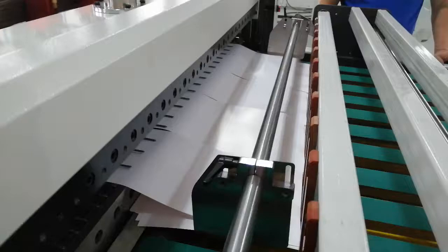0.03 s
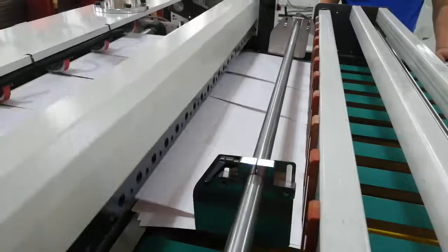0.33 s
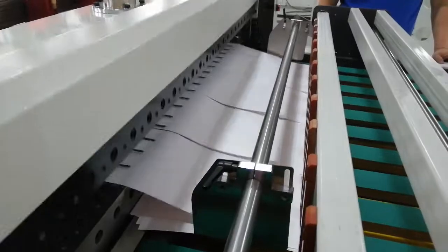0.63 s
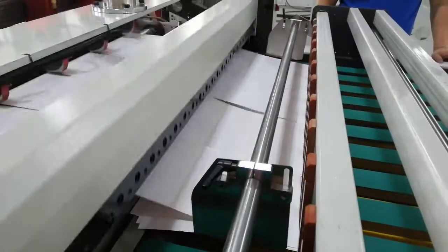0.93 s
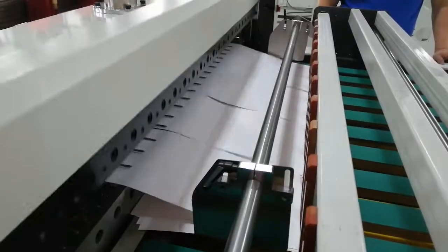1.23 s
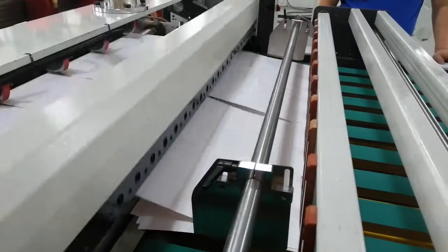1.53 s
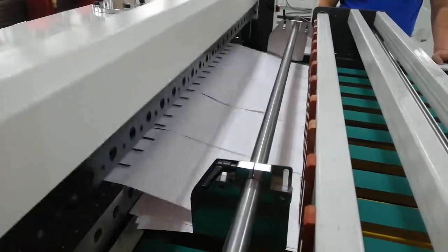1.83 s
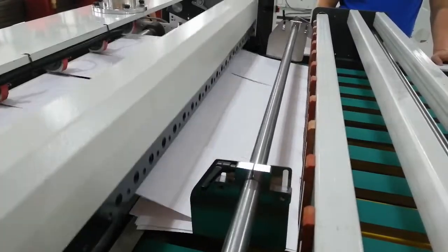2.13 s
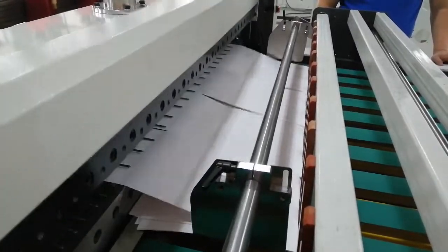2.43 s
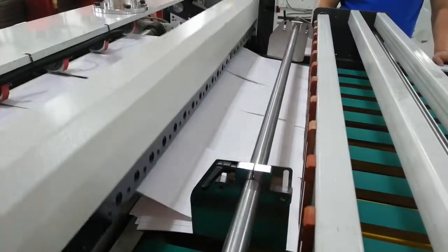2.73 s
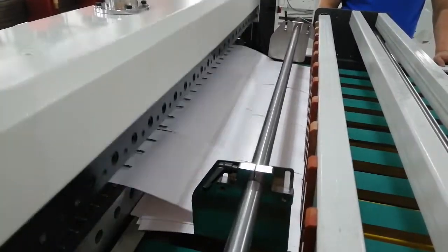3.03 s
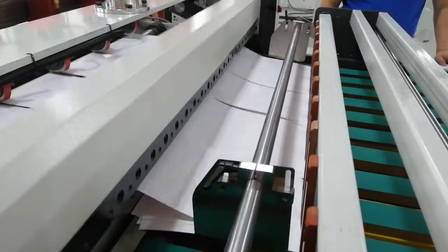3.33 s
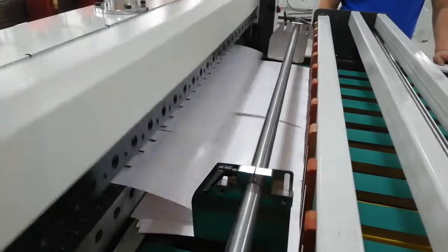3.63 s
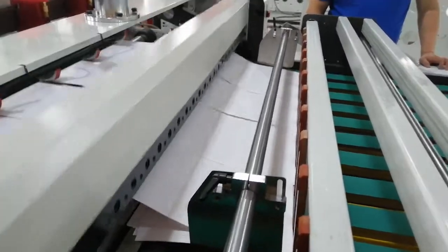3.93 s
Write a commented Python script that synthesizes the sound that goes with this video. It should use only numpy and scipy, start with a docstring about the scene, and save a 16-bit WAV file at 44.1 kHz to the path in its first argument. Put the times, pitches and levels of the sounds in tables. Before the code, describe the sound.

Close up, a rotary paper cutter repeats a quick cycle: two metallic clacks with brief blade squeaks, a soft flop, then a swish of sliding paper. A pulsing drive whine and slightly reverberant factory noise continue underneath.

```python
"""Steel clacks over a whining drive and steady factory noise: a rotary paper sheeter, 98 cuts a minute.
Each turn the knife drum grinds through the web in two clacks that ring the frame, and the blades squeak.
The cut sheet flops down, hisses over the stack and bumps its stop. The drive sags under each cut,
its electronics whistle, and the web rubs through the feed. Heard close by, in a short reverberation."""
import sys
import numpy as np
from scipy import signal
from scipy.fft import rfft, irfft
from scipy.io import wavfile

SR = 44100
rng = np.random.default_rng(int(sys.argv[2]) if len(sys.argv) > 2 else 0)


def transcribe(u):
    """Save the signal u as a 16-bit wav file named by the first command-line argument.

    u: samples, shape (n,) or (channels, n), limited to [-1, 1]; the rate is SR.
    q: integer samples, one column per channel.
    """
    v = np.clip(np.atleast_2d(u).T, -1, 1)
    q = np.round(v * 32767).astype(np.int16)
    wavfile.write(sys.argv[1], SR, q)


N = 176400
TIME_S, FREQ_HZ = np.arange(N) / SR, np.maximum(np.arange(N // 2 + 1) * SR / N, 1)
FIRST_CUT_S, CYCLE_S = 0.3222, 0.6149
CUTS_S = FIRST_CUT_S + CYCLE_S * np.arange(-1, 6)  # times within a turn count from these

# Strength of each turn. Each row: knife, sheet, feed, flop and whine offsets in dB.
TURN_OFFSETS = [(-3, -3, 0, -5, -2.5), (-4, -2, -4.5, -3.5, -2), (-0.5, 1.2, 2, 3.5, 1.5),
                (.5, -0.5, -0.5, 0, .5), (0, 0, -1, 1, 0.5), (-0.5, -.5, -2.5, -2.5, -1),
                (-1, 0, -.5, -3, 0)]
KNIFE_TURN_DB, SHEET_TURN_DB, FEED_TURN_DB, FLOP_TURN_DB, WHINE_TURN_DB = np.array(TURN_OFFSETS).T
# Knife drum contacts. Each row: peak time, attack and decay in seconds, centre in Hz,
# spread in octaves, level in dB.
KNIFE_CONTACTS = [(0.015, 0.013, 0.032, 2900, 0.56, -32), (0.012, 0.0069, 0.031, 2000, .25, -31),
                  (0.145, 0.015, 0.013, 1890, 0.19, -32), (0.016, 0.014, 0.034, 1020, 0.65, -35.5),
                  (0.049, .018, 0.055, 960, 0.65, -33.5), (0.108, 0.0046, 0.016, 630, 0.43, -32),
                  (0.1434, 0.06, 0.018, 2760, 0.75, -32), (0.1226, 0.018, 0.092, 990, 0.64, -32),
                  (0.018, 0.02, 0.02, 6900, 0.51, -36.5), (.138, 0.047, 0.016, 6500, 0.52, -41)]
# Steel frame modes. Each row: frequency in Hz, width in Hz, level in dB re the broad response.
FRAME_MODES = [(564, 79, 10), (695, 19, 9), (854, 17, 3.5), (1086, 27, -0.5), (1350, 42, -12.5),
               (1767, 28, 3.5), (1838, 26.5, 13), (2192, 22, 8), (2745, 99, 6.5), (3120, 100, 5),
               (3490, 230, -5.5), (6180, 200, 10.5), (6790, 237, 6.5)]
# Blade squeaks. Each row: peak time, attack and decay in seconds, pitch in Hz,
# glide in Hz per second, level in dB.
BLADE_SQUEAKS = [(.022, .012, .014, 1880, -4000, -31), (.038, .012, .020, 1600, 7, -39),
                 (0.0155, .010, .012, 3400, 14009, -38), (.136, .012, .010, 2890, 7993, -34.5),
                 (0.1507, .018, .010, 1860, -500, -29)]
# Drive load over a turn. Each row: time in seconds, whine offset in dB.
DRIVE_LOAD = [(.0, -3), (.06, 3.5), (.095, 0.5), (.125, -0.5), (.185, -6), (.21, 1), (0.234, -0.5),
              (.275, 0), (.43, -2.5), (.465, -2), (.545, -8.5), (0.578, 0)]
# Web rubbing in the feed. Each row: frequency in Hz, relative density in dB.
FEED_SPECTRUM = [(1200, -10), (2000, -16.5), (3000, -3.5), (4000, -11.5), (4700, 1), (5300, 3.5),
                 (5900, -6), (6800, -8.5), (9000, -28), (15000, -58)]
# Treble peaks in the hiss. Each row: frequency in Hz, width in Hz, added peak in dB re the broad hiss.
HISS_PEAKS = [(5165, 120, -7.5), (5630, 180, -2.5), (8000, 220, -13.5), (14950, 410, -10)]
# Motor electronics. Each row: centre in Hz, spread in octaves, level in dB.
SWITCHING_BANDS = [(12050, 0.021, -60), (13990, 0.0088, -60)]
# Steady factory noise, with a thin high hiss near 15 kHz.
# Each row: frequency in Hz, relative density in dB.
HALL_SPECTRUM = [(18, -44), (30, -22.5), (205, -5.5), (274, -7), (437, -9), (1560, -13.5), (2840, -13.5),
                 (4090, -22.5), (5440, -26), (10700, -64.5), (15000, -33.5)]
# Hall rumble. Each row: frequency in Hz, relative density in dB.
RUMBLE_SPECTRUM = [(20, 0), (35, -1), (70, 2.5), (130, 2), (220, -2.5), (400, -20.5), (900, -23)]
# Flop, flutter and stop of the sheet. Each row: peak time, attack and decay in seconds,
# centre in Hz, spread in octaves, level in dB.
SHEET_BLOWS = [(.202, 0.017, 0.026, 213, 0.79, -35), (0.271, 0.063, 0.07, 306, 0.59, -39),
               (.345, 0.078, 0.046, 570, 0.53, -38.5), (.468, 0.017, 0.036, 108, 1.22, -42),
               (.206, 0.011, .025, 2380, .9, -37), (.315, .025, 0.029, 3800, 1.1, -37),
               (.470, 0.015, 0.12, 2200, 1.07, -42.5)]
# Slide of the sheet. Each row: time in seconds, relative level in dB.
SLIDE_ENVELOPE = [(.10, -27), (.19, -38), (.25, -12.5), (.32, -0.5), (.40, 1.5), (.47, 3), (.52, -1.5),
                  (0.579, -9.5), (.64, -22), (.72, -68)]
# Hiss of the sliding sheet. Each row: frequency in Hz, relative density in dB.
SLIDE_SPECTRUM = [(880, -40), (1500, -82), (1620, -60), (2030, -49), (2750, -14), (3830, -10.5),
                  (4800, -8.5), (5190, 0.5), (5720, -2.5), (6500, -6.5), (7980, -1.5), (9230, -7.5),
                  (12100, -10), (14500, -3), (15500, -5.5)]
# Stereo image. Each row: frequency in Hz, left-right correlation.
STEREO_CORRELATION = [(100, 1), (300, 1), (700, 0.87), (1500, 0.4), (3000, 0.21), (12000, 0.05)]
# Colour of the two microphone ports. Each row: frequency in Hz, left minus right in dB.
PORT_BALANCE = [(60, 3), (180, 1.3), (360, -3.5), (550, -2), (1100, 4), (1800, 5.5), (2500, 6.5),
                (4000, 8.5), (5400, 11.5), (6600, -0.5), (8000, -15.5), (9000, -5.5), (10000, -8.5),
                (11500, 2.5), (13000, 5.5), (15000, 15)]


def undb(db):
    """Decibels to gain."""
    return 10 ** (np.asarray(db) / 20)


def unit(x):
    """Scale to rms 1."""
    return x / np.sqrt(np.mean(x ** 2))


def curve(points):
    """Interpolate (Hz, value) rows over log frequency."""
    hz, value = np.array(points, float).T
    return np.interp(np.log(FREQ_HZ), np.log(hz), value)


def band(hz, octaves):
    """Gaussian band on the octave scale."""
    return np.exp(-0.5 * (np.log2(FREQ_HZ / hz) / octaves) ** 2)


def colour(pair, gain):
    """Filter two independent signals into a stereo pair, alike in the bass, rms 1."""
    mid, side = rfft(pair) * gain
    correlation = np.clip(curve(STEREO_CORRELATION), 0, 1)
    mid, side = mid * np.sqrt(1 + correlation), side * np.sqrt(1 - correlation)
    return unit(irfft(np.array([mid + side, mid - side]), N))


def noise():
    """Two independent white noises."""
    return rng.standard_normal((2, N))


def walk(rate_hz):
    """Smooth random drift, rms 1."""
    return unit(irfft(rfft(rng.standard_normal(N)) * np.exp(-(FREQ_HZ / rate_hz) ** 2), N))


def swing(peak_s):
    """Cosine peaking once a turn."""
    return np.cos(2 * np.pi * (TIME_S - FIRST_CUT_S - peak_s) / CYCLE_S)


def blows(peak_s, attack_s, decay_s, turn_db):
    """Envelope, once a turn: linear rise, exponential fall."""
    ages_s = [TIME_S - cut_s - peak_s for cut_s in CUTS_S]
    return sum(undb(db) * np.clip(1 + age_s / attack_s, 0, 1) * np.exp(-np.maximum(age_s, 0) / decay_s)
               for age_s, db in zip(ages_s, turn_db))


def knife(fresh_share=0.35):
    """The same steel edges chatter over each other every turn and ring the frame."""
    frame = 1 + sum(undb(db) / (1 + 2j * (FREQ_HZ - hz) / width_hz) for hz, width_hz, db in FRAME_MODES)
    turn_sample = np.arange(N) % round(CYCLE_S * SR)
    out = 0
    for peak_s, attack_s, decay_s, hz, octaves, db in KNIFE_CONTACTS:
        repeating = noise()[:, turn_sample]
        chatter = np.sqrt(1 - fresh_share) * repeating + np.sqrt(fresh_share) * noise()
        force = blows(peak_s, attack_s, decay_s, KNIFE_TURN_DB)
        force_rms = np.sqrt(np.mean(force ** 2))
        out += undb(db) * force_rms * colour(chatter * force, frame * band(hz, octaves))
    return out


def squeaks(rough_hz=35):
    """Short stick-slip tones of the blades, gliding with the contact point."""
    out = 0
    for peak_s, attack_s, decay_s, hz, glide_hz_per_s, db in BLADE_SQUEAKS:
        age_s = (TIME_S - FIRST_CUT_S - peak_s + CYCLE_S / 2) % CYCLE_S - CYCLE_S / 2
        pitch_hz = hz + glide_hz_per_s * np.clip(age_s, -attack_s, 2 * decay_s) + rough_hz * walk(264)
        tone = unit(np.sin(2 * np.pi * np.cumsum(pitch_hz) / SR))
        out += undb(db) * blows(peak_s, attack_s, decay_s, KNIFE_TURN_DB) * tone
    return out


def drive(shaft_hz=91, sag_hz=0.79, wander_hz=0.39, whine_db=-39, gear_db=-46.5):
    """The shaft sags under each cut. Orders 3 and 6 whine with the load; order 4 swells after the cut."""
    speed_hz = shaft_hz - sag_hz * swing(peak_s=0.257) + wander_hz * walk(10.7)
    phase = 2 * np.pi * np.cumsum(speed_hz) / SR
    times_s, levels_db = np.array(DRIVE_LOAD).T
    load_db = np.interp(TIME_S - FIRST_CUT_S, times_s, levels_db, period=CYCLE_S)
    turn_db = np.interp(TIME_S, CUTS_S + CYCLE_S / 2, WHINE_TURN_DB)
    tone = unit(np.sin(3 * phase) + undb(-16) * np.sin(6 * phase))
    whine = tone * undb(whine_db + load_db + turn_db + 2 * walk(25))
    gear = np.sin(4 * phase) * undb(4.5 * swing(peak_s=0.23) + 3.9 * walk(17))
    return whine + undb(gear_db) * unit(gear)


def hiss_peaks():
    """Gain of the narrow treble resonances that colour the paper hiss."""
    return 1 + sum(undb(db) / (1 + (2 * (FREQ_HZ - hz) / width_hz) ** 2)
                   for hz, width_hz, db in HISS_PEAKS)


def feed(level_db=-41, peak_s=0.48, swing_db=5.5, flutter_db=0.9):
    """The web rubs through the feed, loudest just before the cut."""
    turn_db = np.interp(TIME_S, CUTS_S + peak_s, FEED_TURN_DB)
    rub = colour(noise(), undb(curve(FEED_SPECTRUM)) * hiss_peaks())
    return rub * undb(level_db + turn_db + swing_db * swing(peak_s) + flutter_db * walk(25.8))


def whistles():
    """Thin, steady switching whistles of the motor's electronics."""
    return sum(undb(db) * colour(noise(), band(hz, octaves)) for hz, octaves, db in SWITCHING_BANDS)


def hall(steady_db=-39.5, rumble_db=-45.5):
    """Steady factory noise, with a thin high hiss near 15 kHz, over an uneven rumble."""
    steady = colour(noise(), undb(curve(HALL_SPECTRUM))) * undb(steady_db + 0.1 * walk(28))
    rumble = colour(noise(), undb(curve(RUMBLE_SPECTRUM))) * undb(rumble_db + 2.8 * walk(19))
    return steady + rumble


def flops():
    """The sheet pushes air and rustles as it drops, flutters and meets the stop."""
    out = 0
    for peak_s, attack_s, decay_s, hz, octaves, db in SHEET_BLOWS:
        envelope = blows(peak_s, attack_s, decay_s, FLOP_TURN_DB)
        out += undb(db) * envelope * colour(noise(), band(hz, octaves))
    return out


def sheet(slap_db=-37.5, slide_db=-30, grain_db=2.5):
    """The cut sheet slaps down, then slides over the stack with a grainy hiss that swells and dies."""
    slap = blows(peak_s=0.2074, attack_s=0.025, decay_s=0.045, turn_db=SHEET_TURN_DB)
    times_s, levels_db = np.array(SLIDE_ENVELOPE).T
    slide = sum(undb(np.interp(TIME_S - cut_s, times_s, levels_db, left=-100, right=-100) + turn_db)
                for cut_s, turn_db in zip(CUTS_S, SHEET_TURN_DB))
    fibres = noise() * undb(-grain_db * walk(900) + 0.53 * walk(20))
    hiss = colour(fibres, undb(curve(SLIDE_SPECTRUM)) * hiss_peaks())
    return hiss * (undb(slap_db) * slap + undb(slide_db) * slide)


def room(direct, t60_s=0.58, tail_db=-10.5):
    """Add a short diffuse tail from the housing and the hall."""
    tail = noise() * undb(-60 * TIME_S / t60_s)
    tail /= np.sqrt(np.sum(tail ** 2, axis=1, keepdims=True))
    reverb = irfft(rfft(direct, 2 * N) * rfft(tail, 2 * N))[:, :N]
    return direct + undb(tail_db) * reverb


def scene():
    """The whole machine in its hall."""
    return room(knife() + flops()) + squeaks() + sheet() + feed() + drive() + whistles() + hall()


def record(dry, left_lag_s=0.000331, start_s=0.3885, cutoff_hz=15550):
    """Two microphone ports, each with its own colour, the left one late. Abrupt start, steep low-pass."""
    balance_db = curve(PORT_BALANCE)
    ports = undb(np.array([balance_db, -balance_db]) / 2)
    ports /= np.sqrt(np.mean(ports ** 2, axis=0))
    lag = np.exp(-2j * np.pi * FREQ_HZ * np.array([[left_lag_s], [0]]))
    heard = irfft(rfft(dry) * ports * lag, N) * (TIME_S > start_s)
    lowpass = signal.ellip(12, 0.2, 80, cutoff_hz, fs=SR, output="sos")
    return signal.sosfilt(lowpass, heard)


dry = scene()
out = record(dry)
transcribe(out)
```